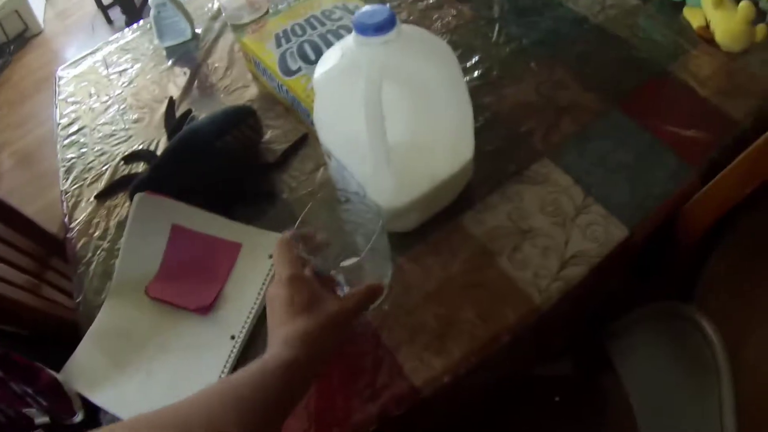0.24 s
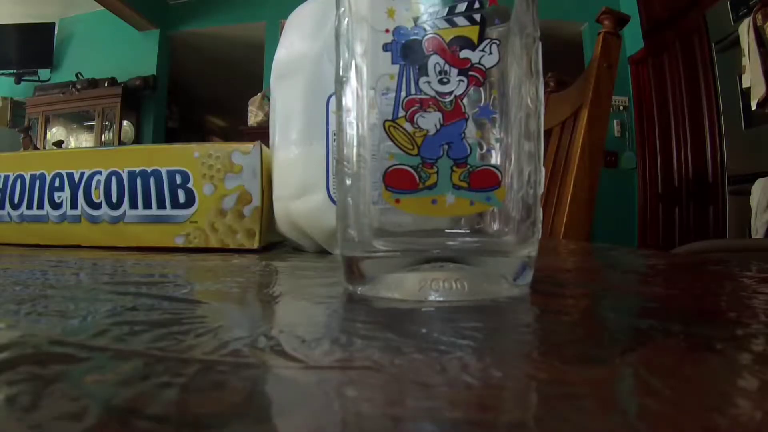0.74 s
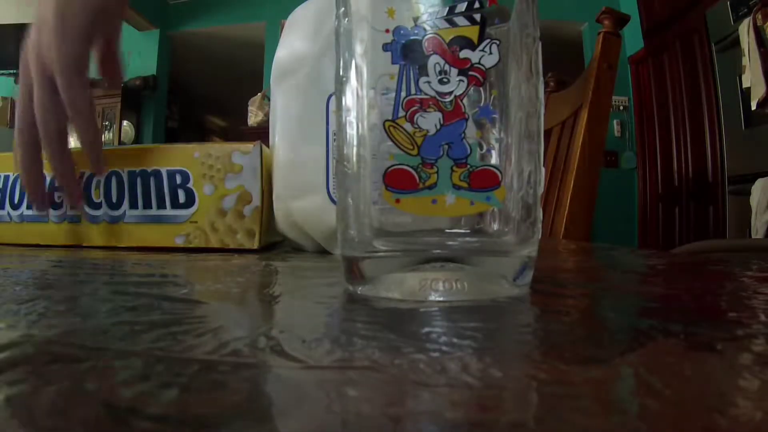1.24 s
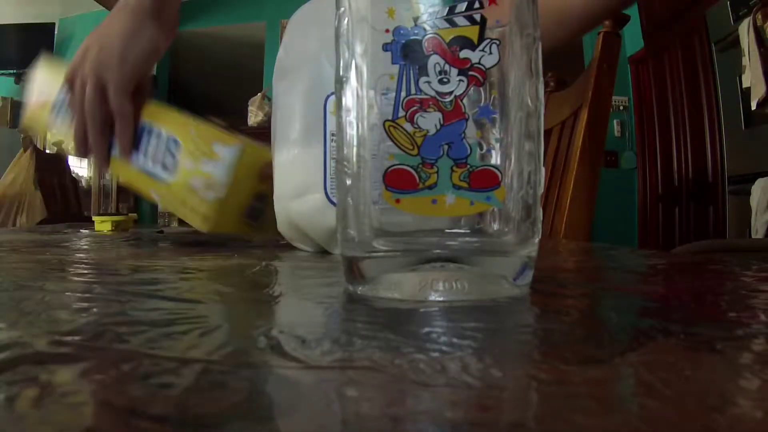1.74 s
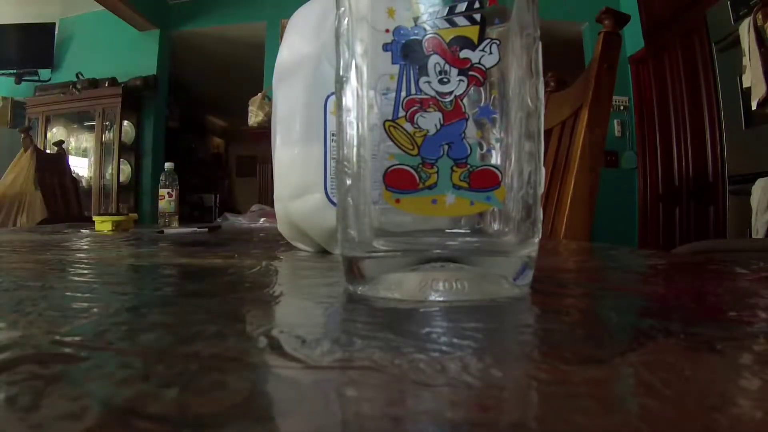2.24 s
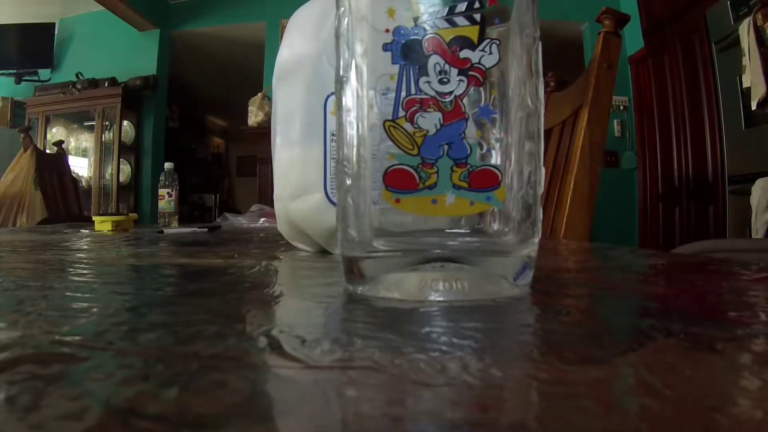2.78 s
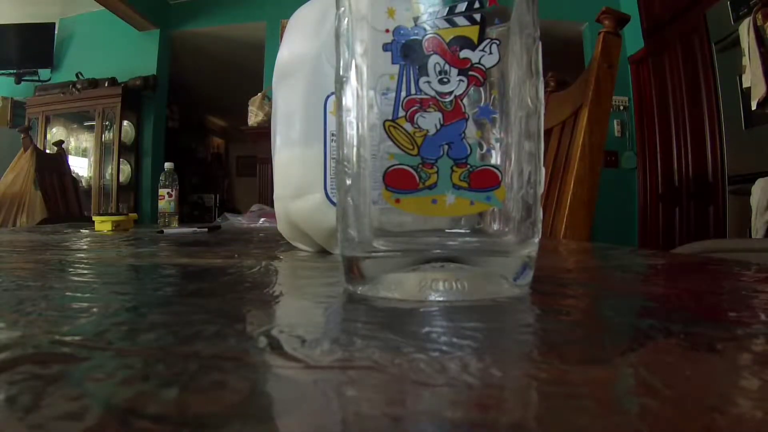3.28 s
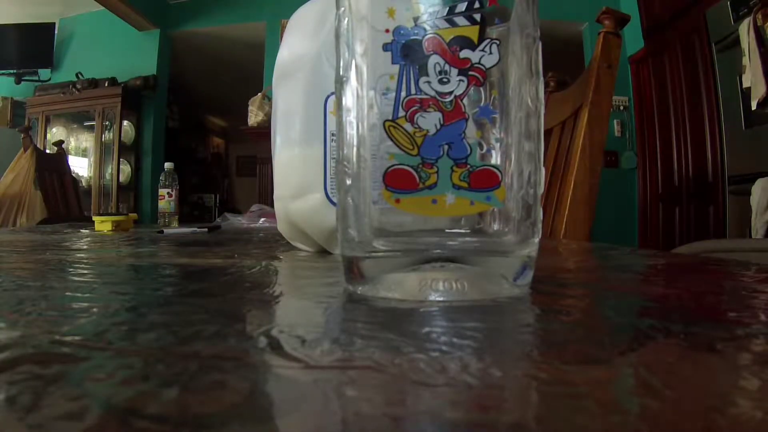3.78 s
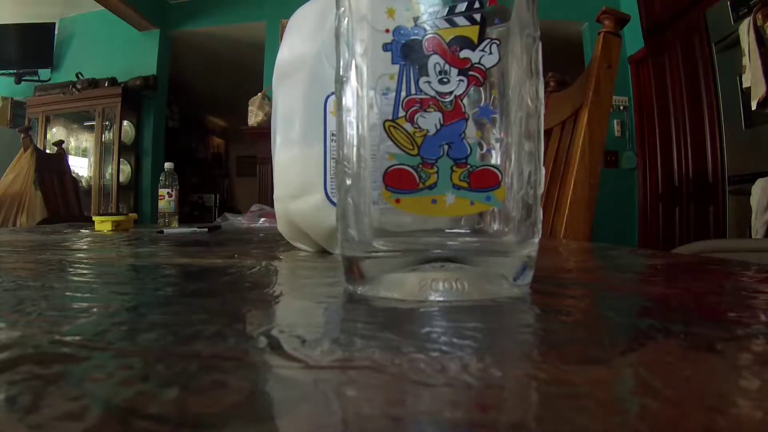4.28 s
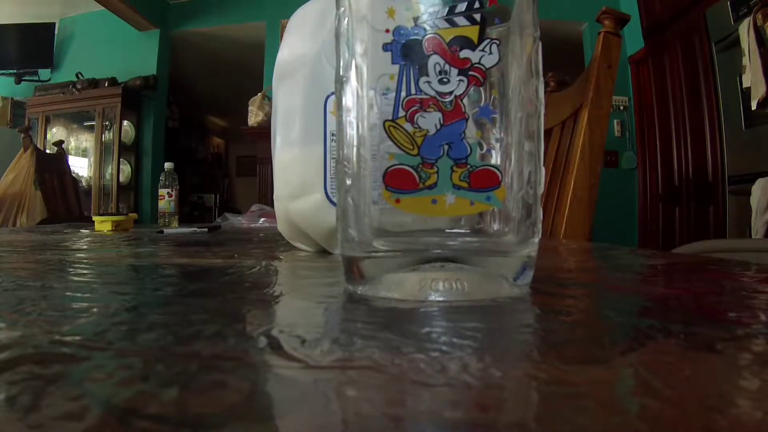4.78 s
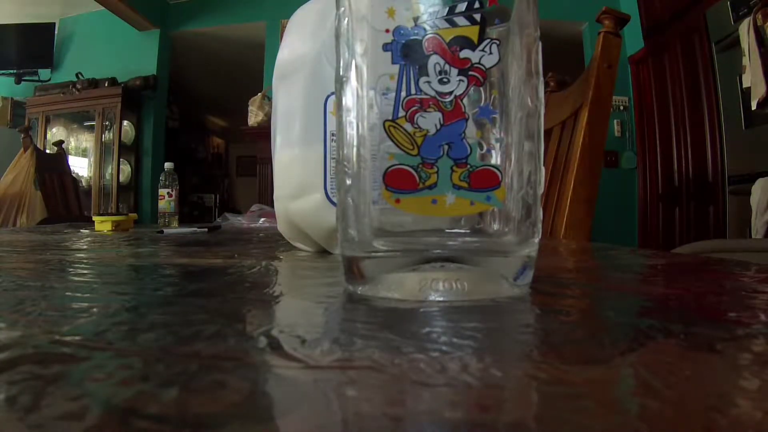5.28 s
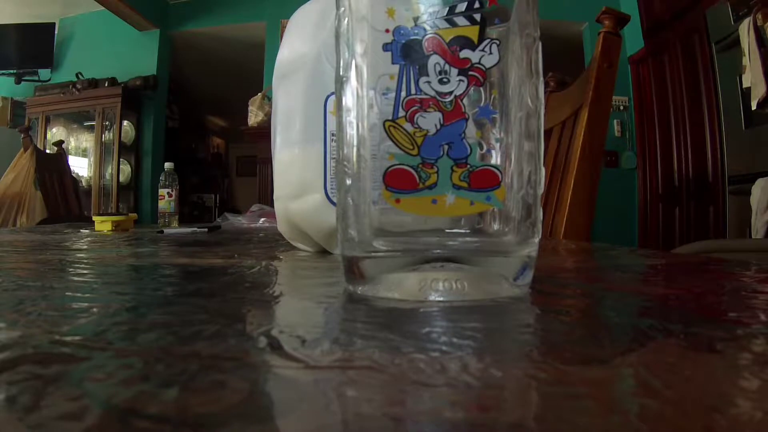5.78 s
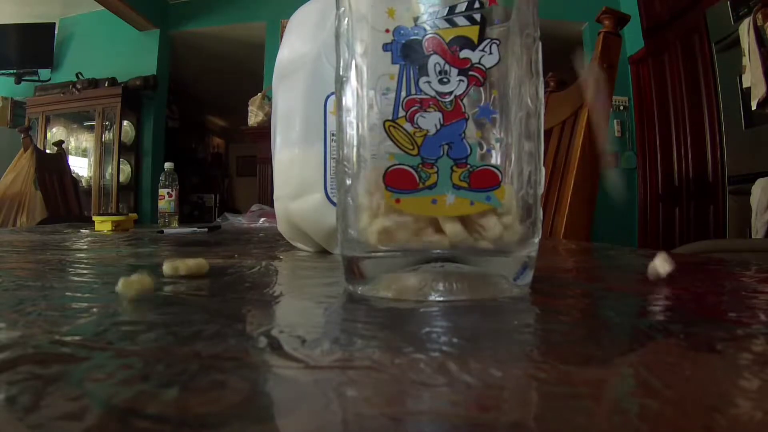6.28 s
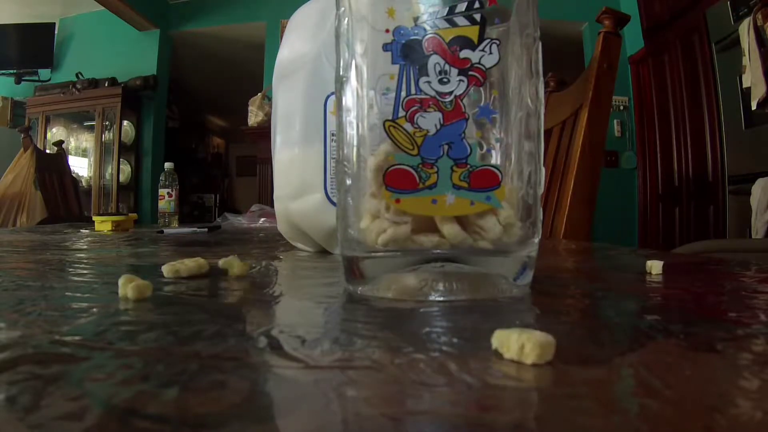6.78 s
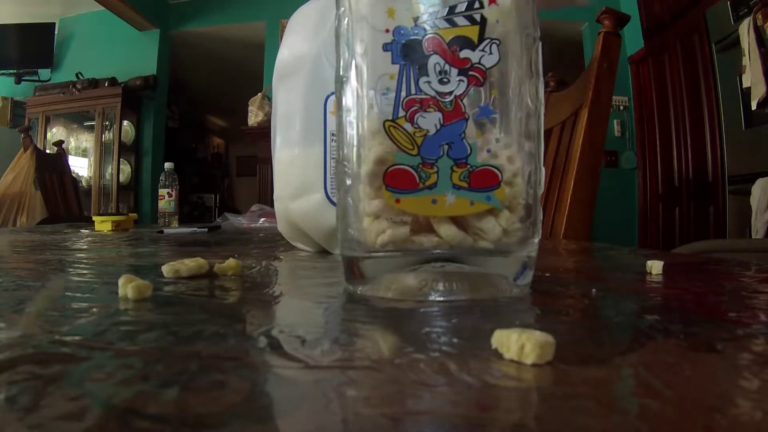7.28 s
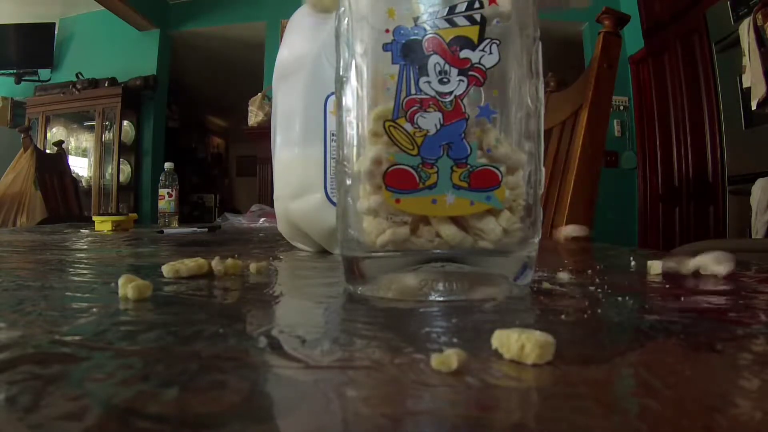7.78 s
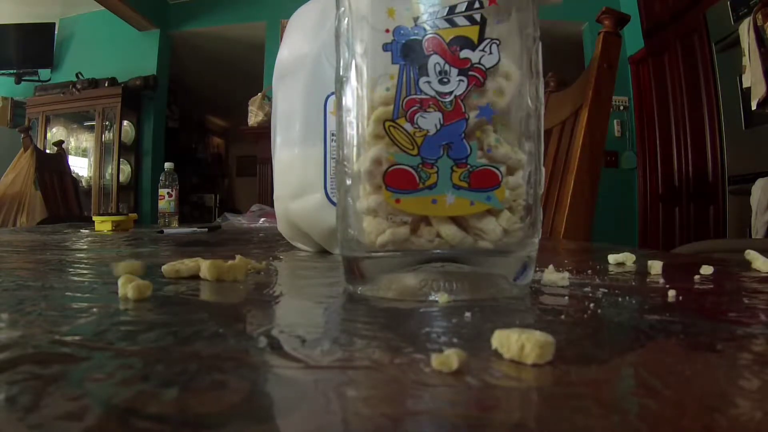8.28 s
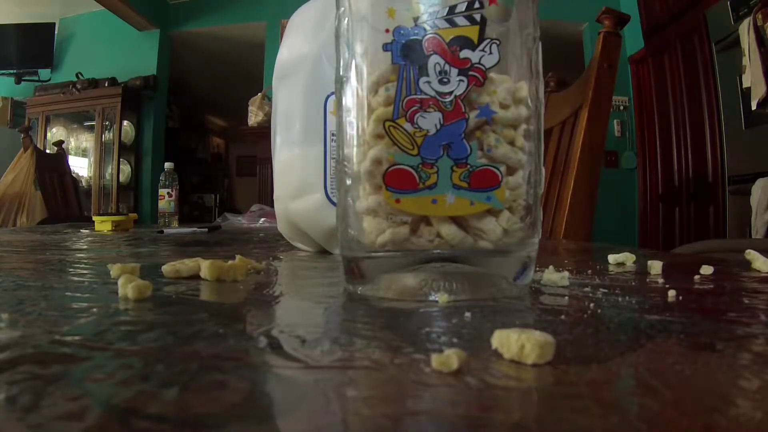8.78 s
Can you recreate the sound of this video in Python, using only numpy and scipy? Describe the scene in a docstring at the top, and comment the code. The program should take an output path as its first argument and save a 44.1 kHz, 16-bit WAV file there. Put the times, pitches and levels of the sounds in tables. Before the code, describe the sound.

In a small live room, a heavy glass lands on a wooden table with a loud low knock, followed by a sharp click and brushing on the microphone. A cardboard box is quietly handled, its flaps popping and liner crackling while cereal tumbles and knocks inside. Then dry pieces rush into the glass with bright clinks, scattering on the table, the ringing growing shorter as it fills. The microphone sits close at table level.

```python
"""A room with a table: a drinking glass is set down hard, and the camera beside it is bumped and brushed.
A cardboard cereal box is picked up and opened; its plastic liner crackles and the cereal tumbles inside.
Dry pieces then pour into the glass, whose ring becomes much shorter as it fills; some bounce on the table.
Blows are impulses with dying, filtered noise; rubbing, tumbling and crinkling are streams of tiny contacts;
the glass is a set of decaying sine modes. Sparse reflections surround them over a steady bed of air noise."""
import sys
import numpy as np
from scipy import signal
from scipy.io import wavfile
from scipy.ndimage import uniform_filter1d

SR = 44100
rng = np.random.default_rng(int(sys.argv[2]) if len(sys.argv) > 2 else 0)


def put_to_file(sound):
    """Save the sound as 16-bit audio at rate SR, in the file named by the first command-line argument."""
    columns = np.atleast_2d(sound).T  # one column per channel
    safe = np.clip(columns, -1, 1)
    whole_steps = np.round(safe * 32767)
    wavfile.write(sys.argv[1], SR, whole_steps.astype(np.int16))


N = 398223
TIME = np.arange(N) / SR

# Spectrum of a clump of cereal striking a surface. Each row: frequency in Hz, relative level in dB.
KNOCK_SPECTRUM = [(59, -63), (100, -40), (403, 7.5), (637, -1.5), (809, 11), (1060, 2.5), (1210, 4.5),
                  (1480, 5.5), (1910, -7.5), (3570, -16.5), (4290, -15), (4880, -9), (8000, -22.5),
                  (10400, -51), (17600, -120)]
KNOCK_T60 = .035  # s
# Spectrum of hard dry pieces in contact. Each row: frequency in Hz, relative level in dB.
RATTLE_SPECTRUM = [(800, -27), (1700, -5.5), (2500, 0), (3400, -1), (4800, 0.5), (6000, 2.5), (7500, -5),
                   (10000, -11), (15500, -16)]


def amp(db):
    """Level to amplitude: 20 dB is a factor of ten."""
    return 10 ** (np.asarray(db) / 20)


def unit(x):
    """Power normalisation: scales a signal to rms 1."""
    return x / np.sqrt(np.mean(x ** 2) + 1e-20)


def read(points, hz):
    """Spectral interpolation: reads a table along a logarithmic frequency axis."""
    f, value = np.transpose(points)
    return np.interp(np.log(hz + 1), np.log(f + 1), value)


def fade(t, t60):
    """Exponential decay: the amplitude falls by 60 dB in t60 seconds."""
    return np.exp(-np.log(1000) * t / np.maximum(t60, 1e-4))


def add(mix, s, sound):
    """Superposition: adds a sound to the mix from time s in seconds."""
    part = mix[round(s * SR):][:len(sound)]
    part += sound[:len(part)]


def colour(x, spectrum, size=4096):
    """Minimum-phase filtering: a causal filter of the given spectrum keeps attacks sharp."""
    hz = abs(np.fft.fftfreq(size, 1 / SR))
    log_gain = np.log(amp(read(spectrum, hz)))
    # the Hilbert transform of the log gain gives the minimum phase
    response = np.exp(np.conj(signal.hilbert(log_gain)))
    taps = np.fft.ifft(response).real[:size // 2]
    return signal.oaconvolve(x, taps)[:len(x)]


def impact(spectrum, t60, scatter_db, size=12000):
    """Impulse response of a body: one contact of peak 1, an impulse followed by a dense, dying ring."""
    ring = rng.standard_normal(size) * fade(TIME[:size], t60)
    ring *= amp(scatter_db) / np.linalg.norm(ring)  # ring energy relative to the impulse
    ring[0] += 1
    sound = colour(ring, spectrum)
    return sound / abs(sound).max()


def impacts(rows, spectrum, t60, scatter_db):
    """Repeated excitation: a table of contacts on one kind of body."""
    out = np.zeros(N)
    for s, db in rows:
        add(out, s, amp(db) * impact(spectrum, t60, scatter_db))
    return out


def grains(spectrum, per_s, spread_db, t60, clump_db, count=28, size=1200):
    """Granular friction: random tiny contacts of uneven size, each with one of several rings, in clumps."""
    rings = rng.standard_normal((count, size)) * fade(TIME[:size], t60)
    slow_noise = uniform_filter1d(uniform_filter1d(rng.standard_normal(N), size=500), size=500)
    clumps = unit(slow_noise)
    sizes = amp(spread_db * np.minimum(rng.exponential(1, N), 4))
    kind = rng.integers(0, count, N)
    stream = np.zeros(N)
    for at in np.flatnonzero(rng.random(N) < per_s / SR):
        add(stream, at / SR, sizes[at] * rings[kind[at]])
    stream = colour(stream, spectrum)
    # level out the slow swings, then impose the clumping
    local_power = abs(uniform_filter1d(stream ** 2, size=2600))
    steady = stream / np.sqrt(local_power + 1e-9)
    return unit(steady * amp(clump_db * clumps))


def background_air():
    """Stationary broadband noise: random pressure filtered to a steady, mostly low hush."""
    # Spectrum of the air noise. Each row: frequency in Hz, relative level in dB.
    air_spectrum = [(15, -35), (25, -3), (82, -9.5), (119, -5.5), (140, -9.5), (198, -5), (313, -11.5),
                    (378, -11.5), (703, -16), (997, -22), (2010, -29), (3930, -32.5), (5430, -34.5),
                    (10900, -44), (15500, -53)]
    level_db = -50.5  # rms
    return amp(level_db) * unit(colour(rng.standard_normal(N), air_spectrum))


def set_down(ring_db=-13, ring_t60_share=0.52):
    """Impact and modal ringing: the thick glass base hits the table top, which rings low."""
    # The landing: time in seconds, peak level of the blow in dB.
    landing = (0.068, -1.9)
    # Modes of the table top. Each row: frequency in Hz, relative level in dB, t60 in s before shortening.
    table_modes = [(136, -25, 0.18), (353, -15, 0.31), (397, -7, 0.15), (480, -19, 0.22), (570, -30, 0.77),
                   (694, -28, 0.19), (750, -19, 0.2), (825, -6, 0.082), (936, -16, 0.62), (1053, -11, 0.15),
                   (1324, -17, 0.3), (1380, -32, 0.73)]
    # Spectrum of the blow. Each row: frequency in Hz, relative level in dB.
    blow_spectrum = [(47, -40), (80, -38), (129, -7.5), (221, -15), (274, -14.5), (340, -8), (491, -3),
                     (610, -15), (825, -13), (920, -15.5), (1610, -25.5), (2280, -42), (5410, -56),
                     (14000, -85)]
    s, db = landing
    t, out = TIME[:SR], np.zeros(N)
    ring = np.zeros(len(t))
    for hz, mode_db, t60 in table_modes:
        ring += amp(mode_db) * fade(t, t60 * ring_t60_share) * np.sin(2 * np.pi * hz * t)
    add(out, s, amp(db) * impact(blow_spectrum, t60=0.23, scatter_db=11.5))
    add(out, s, amp(db + ring_db) * ring)
    return out


def room(x, size=26000):
    """Reverberation: sparse reflections after 5 ms, each frequency band dying at its own rate."""
    # Reverberation time of the room. Each row: frequency in Hz, t60 in seconds.
    decay_times = [(100, 0.43), (400, 0.42), (1500, 0.52), (5000, 0.49), (15000, 0.71)]
    signs = rng.choice([-1., 1.], size)
    taps = signs * (rng.random(size) < .1) * (TIME[:size] > .005)
    hz, t, z = signal.stft(taps, SR, nperseg=256)
    z = z * fade(t, read(decay_times, hz)[:, None])
    tail = signal.istft(z, SR, nperseg=256)[1]
    return signal.oaconvolve(x, tail / np.linalg.norm(tail))[:N]


def camera_bump(s=.6472, click_db=-3, push_db=-6, push_s=0.0036, rise_s=0.000082):
    """Transient excitation of a light case: a click and a pressure push, slow rocking, brushing fingers."""
    # Modes of the camera case. Each row: frequency in Hz, relative level in dB, t60 in seconds.
    case_modes = [(3600, -16.5, 0.0081), (7000, 2, 0.0017), (10800, -15, 0.0029)]
    # The camera rocking. Each row: time of the mid-swing in seconds, peak level in dB, swing time in seconds.
    rocks = [(0.517, -28, 0.024), (0.6653, -9, 0.0029), (.705, -29, 0.027)]
    # Fingers brushing the body. Each row: start in seconds, peak level in dB, t60 in seconds.
    brushes = [(.447, -34.5, 0.015), (.6625, -24, 0.019), (0.691, -30.5, .05), (0.751, -37.5, 0.31),
               (0.819, -40.5, 0.21), (.86, -45, 0.064)]
    # Spectrum of skin contact. Each row: frequency in Hz, relative level in dB.
    skin_spectrum = [(300, 12), (2500, -6.0), (6000, -4.0), (10000, -10), (15500, -16.0)]
    out, t = np.zeros(N), TIME[:SR // 10]
    click = sum(amp(db) * fade(t, t60) * np.sin(2 * np.pi * hz * t) for hz, db, t60 in case_modes)
    push = np.exp(-t / push_s) * (1 - np.exp(-t / rise_s))
    add(out, s, amp(click_db) * click)
    add(out, s, amp(push_db) * push)
    for at, db, swing_s in rocks:
        u = (TIME - at) / swing_s
        out += amp(db) * u * np.exp((1 - u ** 2) / 2)  # one swing each way, peak 1 before its level
    for at, db, t60 in brushes:
        add(out, at, amp(db) * impact(skin_spectrum, t60, scatter_db=10.5))
    return out


def box(rubbing, tumbling):
    """Friction and plate impacts: cardboard rubs and buckles, cereal drums on its walls and the table."""
    # Dull bumps of the box and hand. Each row: start in seconds, peak level in dB.
    bump_times = [(1.086, -23.5), (1.498, -33), (2.865, -28.5), (3.665, -26), (3.872, -25), (4.2, -31),
                  (4.336, -29), (4.915, -28)]
    # Cardboard flaps buckling. Each row: start in seconds, peak level in dB.
    flex_times = [(2.224, -20), (2.416, -26.5), (2.642, -27), (2.715, -22), (2.854, -29), (2.889, -22),
                  (2.984, -20)]
    # Clumps of cereal knocking on the box wall or table. Each row: start in seconds, peak level in dB.
    knock_times = [(3.6959, -12), (3.9256, -15), (4.3131, -6.5), (4.3395, -10), (4.354, -15), (4.4057, -8),
                   (4.434, -12.5), (4.5815, -13), (4.8669, -26.5), (5.1118, -14.5), (5.148, -15.5),
                   (5.1881, -10), (5.236, -12.5), (5.4209, -20.5), (5.6401, -23), (5.7805, -18),
                   (5.8409, -14.5), (6.4568, -14), (6.4754, -17), (6.9723, -19), (8.3656, -21.5),
                   (8.8113, -19.5), (8.9585, -18)]
    # Spectra of bump, flap, rubbing and tumbling. Each row: frequency in Hz, relative level in dB.
    bump_spectrum, flap_spectrum = [(30, -17), (60, -1.5), (120, 2), (280, -4.5), (420, -24), (900, -25),
                                    (2500, -38), (5500, -78)], [(59, -45), (100, -21), (172, -1), (246, -13), (353, 5),
                                                  (474, 5.5), (840, -16.5), (1420, -25), (2070, -37),
                                                  (3010, -20.5), (5000, -33), (6500, -31), (11000, -120)]
    rub_spectrum, tumble_spectrum = [(30, -23), (70, -10), (130, -13), (210, -3.5), (280, -6), (370, -3),
                                     (480, -4.5), (620, -9.5), (850, -12), (1600, -48)], [(250, -26), (500, -0.5), (700, 4), (950, -2),
                                                        (1250, -2), (1550, -1.5), (1850, -10), (2400, -11),
                                                        (5000, -43)]
    rub = rubbing * grains(rub_spectrum, per_s=600, spread_db=2, t60=0.016, clump_db=2)
    tumble = tumbling * grains(tumble_spectrum, per_s=400, spread_db=3.0, t60=0.019, clump_db=2.3)
    bumps = impacts(bump_times, bump_spectrum, t60=0.14, scatter_db=14)
    flexes = impacts(flex_times, flap_spectrum, t60=0.18, scatter_db=9.0)
    knocks = impacts(knock_times, KNOCK_SPECTRUM, t60=KNOCK_T60, scatter_db=1.5)
    return rub + tumble + bumps + flexes + knocks


def crackle(pull, rattling, bright_db=-14, firm_db=-36, brighten=1.0, split_hz=6000):
    """Crackling noise: the liner crinkles brighter the harder it is pulled; pieces rattle and snaps stand out."""
    # Snaps of the liner and of brittle pieces.
    # Each row: start in seconds, peak level in dB, level of the top octave in relative dB.
    snaps = [(1.357, -43, -23), (1.497, -37, -22), (1.674, -35.5, -23), (2.4104, -33, -13),
             (2.5365, -34.5, -20), (2.8522, -22, -21), (3.0695, -19, -40), (3.0825, -18, -24),
             (3.171, -17.5, -20), (3.1866, -20, -18), (3.3587, -20.5, 1), (3.5977, -22, -6),
             (3.76, -21, -17), (3.811, -21, -14), (3.9343, -13, -13), (4.0429, -14.5, -14.5),
             (4.4286, -13.5, -14), (4.531, -17.5, -18), (4.8664, -29, -6), (4.923, -21, -17),
             (5.1135, -20, -18), (5.223, -21, -13), (5.2661, -18.5, -8), (5.4182, -16.5, -8.5),
             (5.47, -26, -18), (6.029, -17, -13), (6.203, -18.5, -8), (7.1728, -12.5, -7),
             (7.4238, -18, -9), (7.6988, -24, 1), (8.0235, -22.5, -16), (8.2586, -23, -23),
             (8.811, -22.5, -21), (8.9594, -26, -5)]
    # Spectrum of the plastic liner. Each row: frequency in Hz, relative level in dB.
    liner_spectrum = [(800, -21.5), (1700, -7), (2500, -1), (3600, 2.5), (5000, 0.5), (6500, -5),
                      (8500, -8), (12000, -15.5), (15500, -23)]
    crinkle = grains(liner_spectrum, per_s=800, spread_db=0.5, t60=.005, clump_db=1.0)
    low_pass = signal.butter(1, split_hz, fs=SR, output="sos")
    soft = signal.sosfilt(low_pass, crinkle)
    bright = crinkle - soft
    out = pull * (soft + bright * (pull / amp(firm_db)) ** brighten)
    rattle = grains(RATTLE_SPECTRUM, per_s=650, spread_db=3, t60=0.018, clump_db=2.5)
    out += amp(4.5) * rattle * rattling
    for s, db, top_db in snaps:
        tilt_db = top_db - bright_db  # enters gradually from 4.5 to 9 kHz
        snap = [(hz, d + tilt_db * np.clip(np.log2(hz / 4500), 0, 1)) for hz, d in liner_spectrum]
        add(out, s, amp(db) * impact(snap, t60=.014, scatter_db=12.0))
    return out


def moves(rows, attack_s, release_t60):
    """Additive power of independent sources: each move swells, holds for its length and dies away."""
    power, t = np.zeros(N), TIME[:SR]
    for s, length, db in rows:
        attack = np.minimum(t / attack_s, 1)
        release = fade(np.maximum(t - length, 0), release_t60)
        add(power, s, (amp(db) * attack * release) ** 2)
    return power


def handling():
    """Shared excitation: every hand move stirs rubbing, tumbling and crinkling in the mix of its kind."""
    # Pulls grip the box and its flaps, tugs open the liner, tilts send the cereal sliding inside.
    # Each row: start in seconds, length in seconds, level in dB before the mix.
    pulls, tugs, tilts = [(1.385, 0.12, -50), (1.54, 0.22, -45.5), (1.81, 0.043, -46), (1.905, 0.027, -44),
                          (1.99, 0.26, -49.5), (2.205, .11, -35), (2.395, 0.068, -42), (2.47, 0.21, -46),
                          (2.7, 0.086, -41), (2.85, 0.061, -31), (2.965, 0.056, -37), (3.585, 0.041, -27),
                          (3.65, 0.064, -24.5), (4.84, 0.027, -45), (4.905, 0.013, -27.5),
                          (5.14, 0.11, -33), (5.27, .33, -40.5)], [(2.84, .2, -45), (3.05, 0.061, -39), (3.13, 0.099, -43.5),
                                         (3.265, 0.038, -36), (3.34, 0.044, -38), (3.415, 0.13, -39),
                                         (3.57, 0.4, -37.5), (3.97, 0.222, -44), (4.03, 0.031, -35),
                                         (4.19, .26, -34), (4.46, 0.18, -41)], [(3.52, 0.25, -33.5), (3.66, 0.062, -41),
                                                       (4.03, 0.13, -38.5), (4.185, 0.23, -30),
                                                       (4.52, 0.04, -31.5), (4.6, 0.1, -44),
                                                       (4.965, 0.17, -37.5), (5.07, 0.11, -34.5),
                                                       (5.27, 0.24, -43)]
    # Envelope of each kind: attack in seconds, release t60 in seconds.
    pull_shape, tug_shape, tilt_shape = (0.018, 0.15), (0.021, 0.078), (0.025, 0.15)
    # What each kind stirs: cardboard rubbing in dB, cereal tumbling in dB, liner crinkling in dB.
    pull_mix, tug_mix, tilt_mix = (0, -6.5, -14.5), (-3.5, -0.5, 0), (-5.5, 0, -8.5)
    kinds = (pulls, pull_shape, pull_mix), (tugs, tug_shape, tug_mix), (tilts, tilt_shape, tilt_mix)
    power = sum(np.outer(amp(mix) ** 2, moves(rows, *shape)) for rows, shape, mix in kinds)
    return np.sqrt(power)


def pouring():
    """Granular flow: rubbing, tumbling and rattling follow one flow, whose first wave slides on cardboard."""
    # Flow of cereal out of the box. Each row: time in seconds, level in dB before the mix.
    flow_curve = [(5.551, -45.5), (5.62, -38.5), (5.92, -30.5), (6.18, -34.5), (6.328, -41), (6.68, -42.5),
                  (6.97, -39.5), (7.15, -37.5), (7.42, -39), (7.56, -36), (7.68, -40.5), (7.83, -37),
                  (7.95, -42.5), (8.3, -36.5), (8.46, -41.5), (8.57, -36.5), (8.65, -41.5), (9.02, -41)]
    # What the flow stirs: cardboard rubbing in dB, cereal tumbling in dB, pieces rattling in dB.
    flow_mix = (-5, -1.34, -6)
    slide_end_s, slide_fade_s = 5.92, 0.083
    slide_rub_db, slide_hush_db = 7, 3  # more rubbing and less rattle during the slide
    s, db = np.transpose(flow_curve)
    flow = amp(np.interp(TIME, s, db)) * (TIME > s[0])
    sliding = .5 - .5 * np.tanh((TIME - slide_end_s) / slide_fade_s)
    rub, tumble, rattle = np.outer(amp(flow_mix), flow)
    return rub * amp(slide_rub_db * sliding), tumble, rattle * amp(-slide_hush_db * sliding)


def drops(tumbling, per_s=16, drop_db=7, spread_db=3):
    """Random (Poisson-like) impacts: single pieces in the flow land harder than the rest."""
    out = np.zeros(N)
    for at in np.flatnonzero(rng.random(N) < per_s / SR):
        size = tumbling[at] * amp(drop_db + spread_db * min(rng.exponential(), 2))
        add(out, at / SR, size * impact(KNOCK_SPECTRUM, t60=KNOCK_T60, scatter_db=4.5))
    return out


def glass(rattling, contact_db=4, touches_per_s=30):
    """Damped modal vibration: strikes tick and lift the modes, which die by their own loss plus the heap's."""
    # Pieces striking the glass; where one lands sets its overtones. Each row: start in seconds, level of the
    # lowest mode in dB, then relative dB of the 4.2 kHz, the 6.4 kHz and the two highest families.
    clinks = [(5.8943, -18.5, -5.5, 0, -11), (5.93, -19.5, -8, -18, -20), (5.98, -21.5, -21, -22, -24),
              (6.05, -20, -11, -11, -33), (6.384, -38.5, -11, -16, 2.5), (6.733, -28, -10, -14, -10),
              (6.791, -25.5, -11.5, -6, -23), (6.857, -30.5, -15, -1, -19), (7.02, -31, -8, -15, -15),
              (7.137, -29.5, 10.5, 3.5, -4), (7.2343, -26, -17, -14, -1.5), (7.371, -22.5, -4, 1, -4),
              (7.446, -28, -5, -4, 2.5), (7.499, -27, -9, -17, -6), (7.66, -37, -3, -8, -12),
              (7.746, -28, -3.5, -22, -14), (7.78, -18, -11, -10.5, -26), (7.847, -27, -1, -7, -5),
              (8.092, -34, -7, 1, 0.5), (8.208, -39, 0, -3, 3), (8.238, -33, -14, -19, -16),
              (8.409, -31.5, -14, -18, -16), (8.44, -29, -19, -10, -9), (8.595, -28, -13, 3.5, -8),
              (8.611, -30, 0, 1.5, -1), (8.729, -26, -9, -7.5, -18), (8.746, -33.5, -4, 1, -0.5),
              (8.965, -25, -9, -6, -10)]
    # Modes of the glass, family by family; close pairs beat.
    # Each row in a family: frequency in Hz, relative level in dB, t60 in seconds without the heap.
    mode_families = [
        [(2025, -1, .62)],
        [(4199, -.5, .33), (4222, -13, .18), (1750, -13, .8)],
        [(6371, -1, .17), (6356, -12, .12), (7486, -11, .14), (11154, -18, .15)],
        [(7106, 0, .15), (5857, -4, .11)],
        [(9245, 0, .16), (10368, -13, .13), (10573, -11, .13)],
    ]
    # Damping of the wall by the heap. Each row: time in seconds, extra decay in dB per second.
    heap_damping = [(5.9, 39), (7.3, 20), (7.8, 92), (8.6, 236)]
    # Drive of each family, lowest first. Each row: dB added in a clear strike,
    # dB of light touches relative to the rattle.
    family_drive = [(-0.5, -6), (0, -7), (0, -7), (0, -9), (-6.5, -13)]
    s, low, second, third, high = np.transpose(clinks)
    families_db = low + np.array([0 * low, second, third, high, high])
    at = np.round(s * SR).astype(int)
    heap = np.interp(TIME, *np.transpose(heap_damping))
    touches = (rng.random(N) < touches_per_s / SR) * rattling * (TIME > s[0])
    ticks_db = np.max(families_db, axis=0) + contact_db
    out = impacts(zip(s, ticks_db), RATTLE_SPECTRUM, t60=0.0047, scatter_db=29)
    for strikes_db, (strike_db, touch_db), modes in zip(families_db, family_drive, mode_families):
        # light touches of random size between the clear strikes
        push = amp(touch_db) * touches * rng.exponential(1, N) + 1e-9
        push[at] = amp(strikes_db + strike_db)
        for hz, db, t60 in modes:
            loss = np.cumsum(np.log(1000) / t60 + heap * np.log(10) / 20) / SR
            # a push lifts the swing only where it exceeds what still rings
            swing = np.exp(np.maximum.accumulate(np.log(push) + loss) - loss)
            tone = np.sin(2 * np.pi * (hz * TIME + rng.random()))
            out += amp(db) * uniform_filter1d(swing, size=24) * tone
    return out


def scene():
    """Direct and reverberant sound: each source sends its own share to the room, the box more than the glass."""
    air = background_air()
    hand_rub, hand_tumble, pull = handling()
    pour_rub, pour_tumble, rattling = pouring()
    landing = set_down()
    carton = box(hand_rub + pour_rub, hand_tumble + pour_tumble)
    crisp = crackle(pull, rattling)
    clinks = glass(rattling)
    carton = carton + drops(pour_tumble)
    to_room = amp(-7.5) * landing + amp(-5.5) * carton + amp(-6.0) * crisp + amp(-16) * clinks
    return (landing + carton + crisp + clinks + room(to_room) + camera_bump() + air)[None]


def record(dry):
    """Gating, clipping and band limiting: a brief silence, a full-scale limit and a low-pass edge."""
    # The brief silence: from and to, in seconds.
    silence = (.457, .505)
    audible = 1. * ((TIME < silence[0]) | (TIME > silence[1]))
    gate = uniform_filter1d(audible, size=40)
    edge_hz = 15600
    edge = signal.firwin(301, edge_hz, window=("kaiser", 9), fs=SR)
    return signal.oaconvolve(np.clip(dry * gate, -1, 1), edge[None], "same")


dry = scene()
out = record(dry)
put_to_file(out)
```